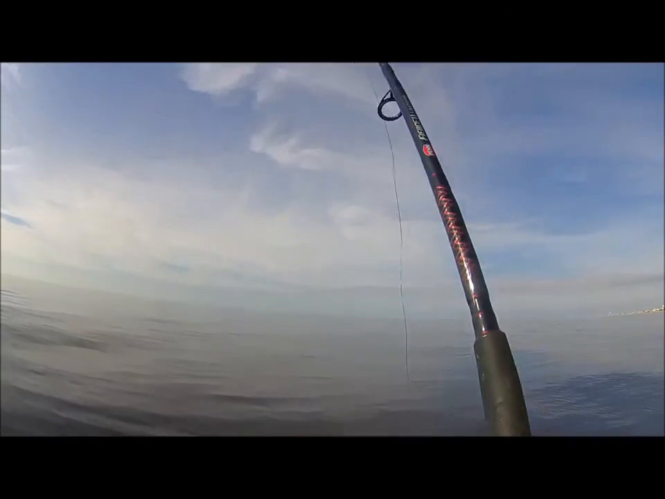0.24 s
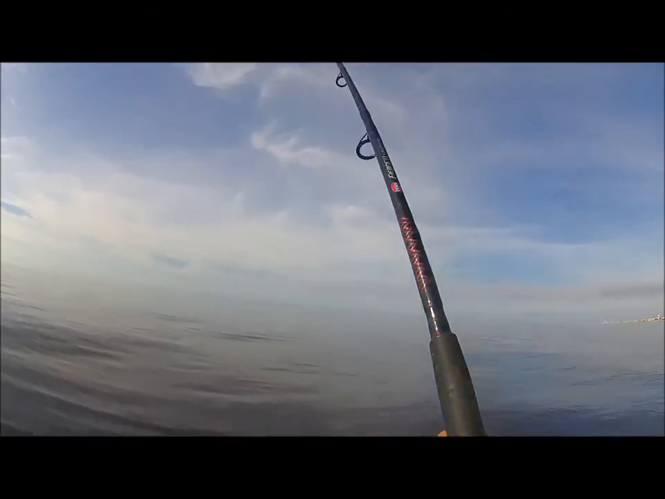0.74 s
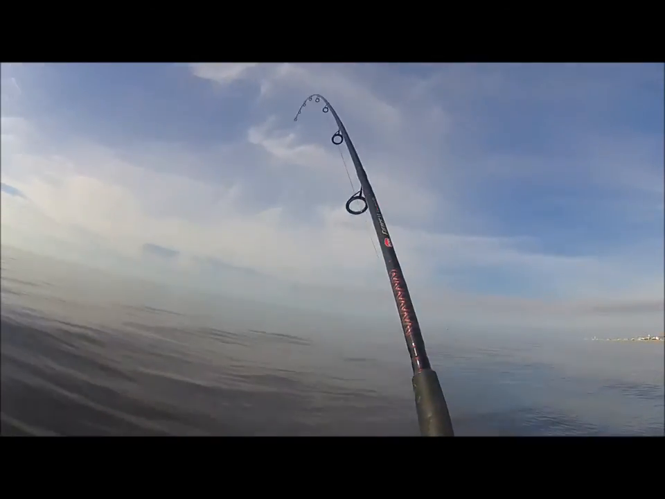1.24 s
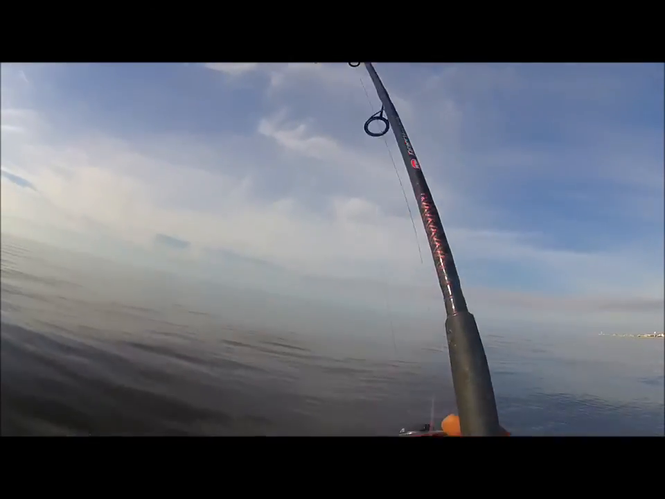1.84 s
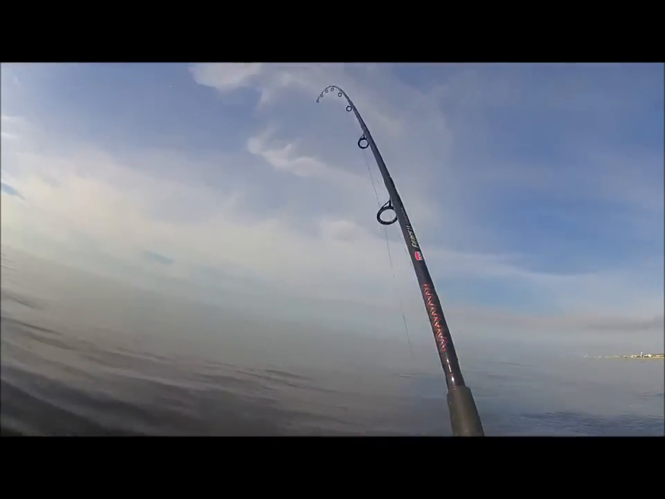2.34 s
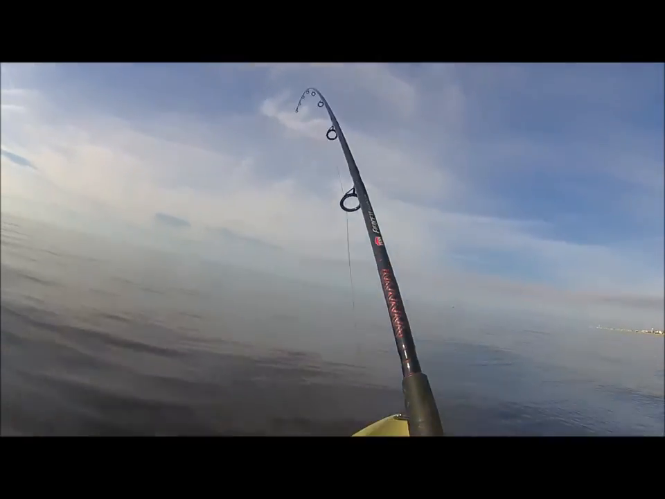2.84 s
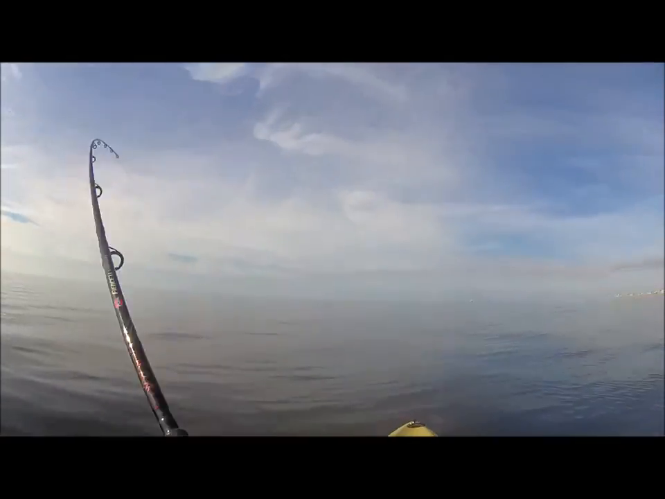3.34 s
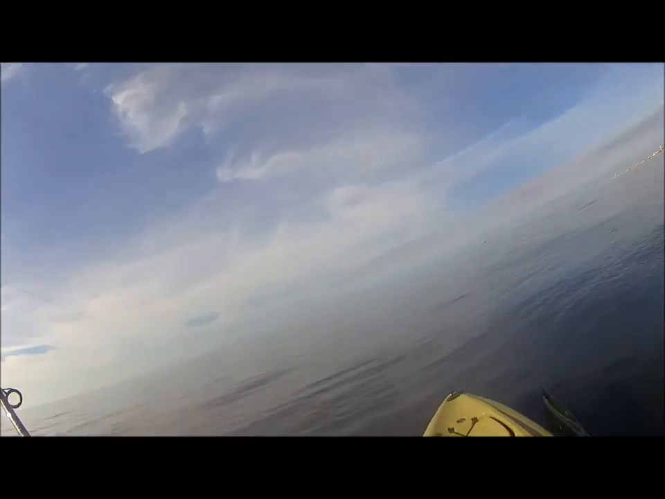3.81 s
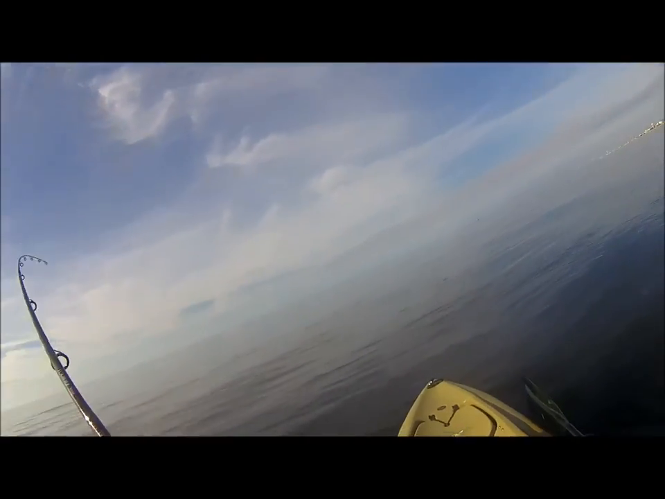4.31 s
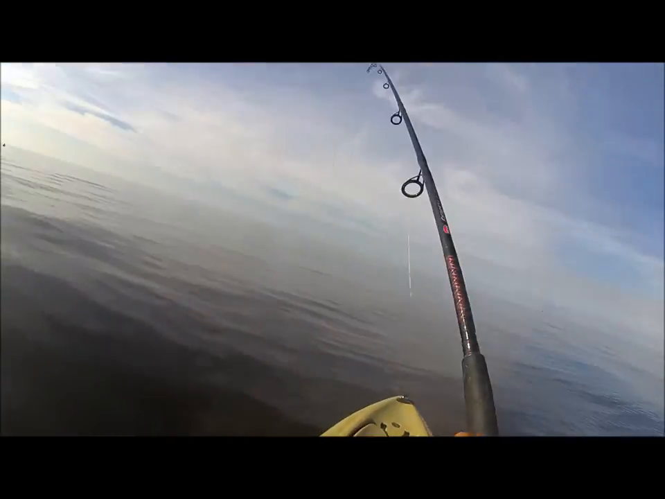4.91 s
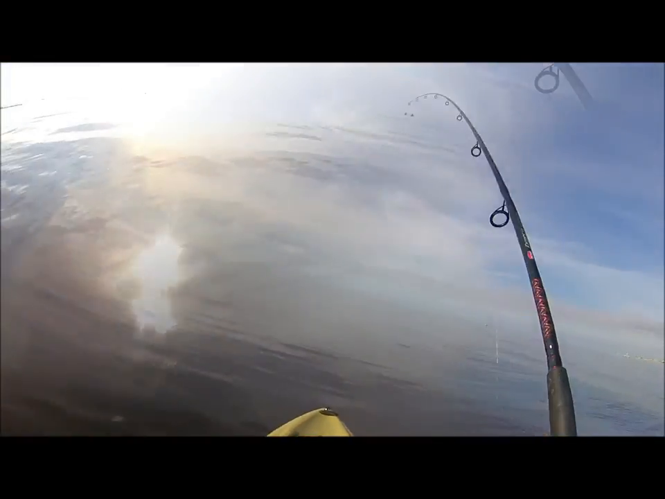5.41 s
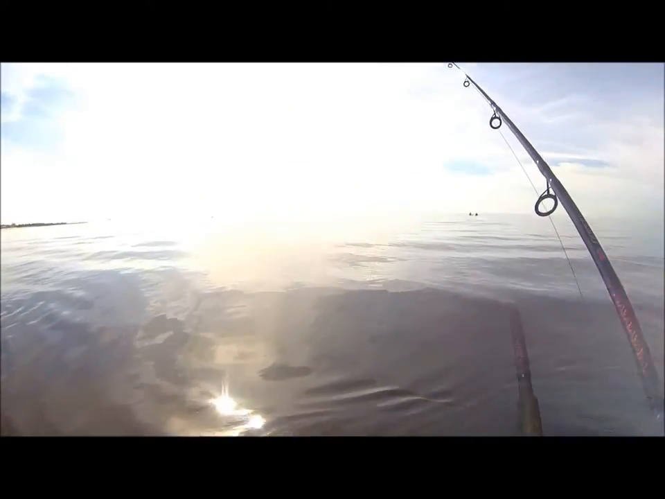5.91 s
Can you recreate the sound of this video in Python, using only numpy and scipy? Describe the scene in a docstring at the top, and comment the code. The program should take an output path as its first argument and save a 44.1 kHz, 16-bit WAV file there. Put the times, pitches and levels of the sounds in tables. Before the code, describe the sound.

Muffled close reel noise on a kayak: chirpy squeaks, clicks and rattles, then a low hull rub and a steadier gritty whirr.

```python
"""In a kayak, through a camera's closed housing: a fishing reel whirrs, squeaks, clacks and ticks under load.
The reel is patter, ratchet teeth and noise bursts ringing in resonances, with gliding sines for the squeaks.
The rod butt rubs and knocks on the hull in low wavering tones and noise, and water laps as lumpy low noise.
A far engine hums in a few sine orders; the electronics add shaped hiss and a comb of thin sines."""
import sys
import numpy as np
from scipy import signal
from scipy.fft import rfft, irfft
from scipy.io import wavfile

SR = 44100
rng = np.random.default_rng(int(sys.argv[2]) if len(sys.argv) > 2 else 0)


def log_audio(samples):
    """Write samples as a 16-bit WAV file to the path given in sys.argv[1]."""
    # one column per channel
    frames = np.atleast_2d(samples).T
    # limit to full scale, then quantise
    limited = np.clip(frames, -1, 1)
    pcm = np.round(limited * 32767).astype(np.int16)
    wavfile.write(sys.argv[1], SR, pcm)


N = 271642
T = np.arange(N) / SR

# resonances of the air in the housing, lower group: f/Hz, width/Hz, level/dB
LOW_MODES = [(1393, 134, -1), (1825, 164, 2.5), (1970, 56, 6.5), (2150, 140, 9), (2423, 128, 3.5),
             (2560, 188, 8)]
# resonances of the reel, for ticks and ratchet: f/Hz, width/Hz, level/dB
REEL_MODES = [(1790, 340, -3), (3980, 660, -1), (4980, 380, 10.5), (6120, 460, 0.5), (7470, 470, 1.5),
              (8720, 450, -1), (10260, 1600, -7), (12600, 500, -9.5)]
# runs of the ratchet as the handle comes round: middle t/s, length/s, level/dB, middle rate/(teeth per s)
RATTLES = [(0.565, 0.063, -57, 74), (0.868, 0.069, -53, 117), (1.135, 0.11, -54, 120),
           (1.447, 0.096, -59, 100), (1.717, 0.11, -53.5, 130), (2.053, 0.19, -57, 63),
           (2.576, 0.079, -60, 110), (2.839, 0.21, -55, 215), (3.049, 0.18, -59, 63),
           (3.366, 0.17, -63.5, 45), (3.696, 0.14, -59, 61), (5.526, 0.1, -62, 44)]
# ratchet level between the runs: t/s, level/dB
RATTLE_FLOOR = [(0, -66), (2.2, -63.5), (4.2, -78), (4.88, -82), (5.0, -67), (6.16, -61)]


def amp(db):
    """Decibels to a linear gain."""
    return 10 ** (np.asarray(db) / 20)


def evened(x):
    """Scales a sound to rms 1."""
    return x / np.sqrt(np.mean(x ** 2) + 1e-20)


def add(mix, s, sound):
    """Lays a sound into the mix from s seconds on."""
    part = mix[round(s * SR):][:len(sound)]
    part += sound[:len(part)]


def columns(rows, t):
    """Reads every column of a table at the times t, in straight lines between rows."""
    s, *rest = np.transpose(rows)
    return [np.interp(t, s, column) for column in rest]


def wander(length, hz):
    """Slow chance of rms 1, changing about hz times a second: noise through two equal smoothers."""
    noise = rng.standard_normal(length + 2000)
    smoother = [1, -2 * np.exp(-6 * hz / SR), np.exp(-12 * hz / SR)]
    return evened(signal.lfilter([1], smoother, noise)[2000:])  # the filter settles first


def resonate(x, hz, width):
    """Shifts the curve hz down to zero, smooths, and shifts back: a resonance of gain 1."""
    turn = np.exp(2j * np.pi * np.cumsum(hz * np.ones(len(x))) / SR)
    r = np.exp(-np.pi * width / SR)
    return 2 * (turn * signal.lfilter([1 - r], [1, -r], x / turn)).real


def ring(x, modes):
    """Steep modes, each resonated twice; alternating signs leave dark valleys between them."""
    out = 0
    for k, (hz, width, db) in enumerate(modes):
        once = resonate(x, hz, width * 1.35)
        out = out + (-1) ** k * amp(db) * resonate(once, hz, width * 1.35)
    return out


def lapping():
    """Water on the hull: noise of lumpy level through a broad, low resonance."""
    # slow swell of the water: t/s, level/dB
    swell = [(0, -57.5), (.8, -60), (2.0, -59.5), (2.8, -58.5), (3.1, -63.5), (4.1, -58.5), (5.2, -58.5),
             (5.7, -58.5), (6.16, -54.5)]
    noise = rng.standard_normal(N) * amp(2.6 * wander(N, 35))
    water = resonate(resonate(noise, 63, 112), 63, 112)
    return amp(columns(swell, T)[0]) * evened(water)


def engine():
    """Wavering orders of a far motor; as it leaves the upper ones fade, while the lowest grows."""
    # firing rate, sinking: t/s, f/Hz
    firing = [(0, 61.7), (1.5, 60.85), (4.2, 60.3), (6.16, 59.2)]
    # orders of the firing rate: multiple, peak level at the start before the waver/dB
    orders = [(3, -72), (4, -62.5), (5, -62.5), (6, -67), (7, -73)]
    hz = columns(firing, T)[0] * (1 + 0.0013 * wander(N, 4.3))
    turns = 2 * np.pi * np.cumsum(hz) / SR
    hum = 0
    for k, db in orders:
        tilt_db = -0.9 * (k - 4) * T  # steeper for higher orders
        hum = hum + amp(db + tilt_db + 1.4 * wander(N, 1.6)) * np.sin(k * turns)
    return hum


def electronics():
    """Smooth hiss and a steady comb of thin tones, stepping up in level together."""
    # spectrum of the hiss: f/Hz, relative density/dB
    hiss_curve = [(15, -12), (60, -23), (120, -7.5), (250, -8), (500, -12.5), (1000, -16), (3000, -21),
                  (6000, -24.5), (16000, -27.5)]
    # comb of tones: multiple of the base pitch, rms level before the gain/dB
    comb = [(10, -75), (21, -75), (22, -72), (23, -67), (24, -66.5), (25, -66), (26, -65.5), (27, -72),
            (31, -78), (33, -78), (34, -80)]
    # shared gain of hiss and whine: t/s, gain/dB
    gain = [(0, 0), (4.86, 0.5), (4.89, 4.5), (6.16, 4)]
    base_hz, hiss_db = 172.92, -57.5  # the hiss level is before the gain
    hz = np.fft.rfftfreq(N, 1 / SR)
    f, db = np.transpose(hiss_curve)
    shape = amp(np.interp(np.log(hz + 1), np.log(f), db))
    hiss = evened(irfft(rfft(rng.standard_normal(N)) * shape, N))
    whine = 0
    for k, rms_db in comb:
        whine = whine + np.sqrt(2) * amp(rms_db) * np.sin(2 * np.pi * (k * base_hz * T + rng.random()))
    return (amp(hiss_db) * hiss + whine) * amp(columns(gain, T)[0])


def knock(s, db, hz):
    """A soft push that rings the hull for a couple of cycles, with a short puff over it."""
    t = np.arange(4000) / SR
    puff = evened(resonate(rng.standard_normal(len(t)), 290, 1200))
    body = np.sin(2 * np.pi * hz * t) + 0.4 * puff
    swell = (t / 0.0034) * np.exp(1 - t / 0.0098)  # fullest after 9.8 ms
    return s, amp(db) * body * swell


def rub(rows):
    """The butt drags in slips that shake the hull near its pitch and rasp in the housing."""
    slip_share = 0.4  # decay of each slip's rasp, in hull cycles
    t = np.arange(rows[0][0], rows[-1][0], 1 / SR)
    db, hz, rasp_db = columns(rows, t)
    turns = np.cumsum(hz * (1 + 0.068 * wander(len(t), 30.4))) / SR
    tone = np.sin(2 * np.pi * turns)
    noise = rng.standard_normal(len(t))
    rumble = resonate(resonate(noise, hz * 1.4, 68), hz * 1.34, 61)
    boom = evened(tone + 0.5 * evened(rumble))

    slips = 0.5 + np.exp(-(turns % 1) / slip_share)
    scrape = noise * slips * amp(1.5 * wander(len(t), 150))
    rasp = evened(resonate(resonate(scrape, 3790, 900), 3790, 900))
    rasp = rasp + 0.6 * evened(ring(scrape, LOW_MODES))
    outer_modes = [(1600, 250, 6), (6600, 900, -7), (8840, 500, -1)]  # f/Hz, width/Hz, level/dB
    rasp = rasp + 0.12 * evened(ring(scrape, outer_modes))
    return t[0], (amp(db) * boom + amp(rasp_db) * rasp) * signal.windows.tukey(len(t), .15)


def clack(s, db, hz, ring_ms):
    """One sine note with a sharp start, dying away exponentially."""
    t = np.arange(2400) / SR
    envelope = np.minimum(t / 0.00022, 1) * np.exp(-1000 * t / ring_ms)
    return s, amp(db) * np.sin(2 * np.pi * hz * t) * envelope


def ticks():
    """Each tick is a burst a few ms long that rings the reel's modes in its own mix."""
    # ticks of the reel: t/s, peak level/dB
    hits = [(0.178, -42), (0.3222, -38.5), (0.3686, -45), (0.394, -50), (0.411, -45), (0.528, -49),
            (0.5507, -38), (0.821, -40), (0.836, -36), (0.706, -39.5), (1.059, -36.5), (1.0929, -48),
            (1.1187, -38), (1.1867, -44), (1.24, -45), (1.332, -43), (1.3902, -42), (1.419, -41),
            (1.4551, -38.5), (1.5795, -42.5), (1.6372, -37), (1.6622, -46), (1.697, -38), (1.7925, -40),
            (1.8528, -38), (1.934, -42), (1.882, -43), (1.9815, -38), (2.0028, -39), (2.0195, -36),
            (2.155, -39), (2.533, -45), (2.9366, -44), (2.986, -37.5), (3.0305, -37), (3.061, -40),
            (3.1173, -43), (3.2792, -39), (3.31, -45), (3.3335, -39), (3.403, -36.5), (3.5857, -38.5),
            (3.607, -44), (3.632, -40), (3.7615, -41), (3.779, -49), (3.798, -42), (3.8165, -45),
            (4.412, -50), (4.497, -46), (4.5226, -45), (4.7112, -50), (4.795, -39.5), (5.1667, -40.5),
            (5.3083, -43), (5.4605, -38)]
    t, out = np.arange(800) / SR, np.zeros(N)
    for s, db in hits:
        burst = rng.standard_normal(len(t)) * np.exp(-t / 0.002)
        modes = []
        for hz, width, mode_db in REEL_MODES:
            detune, lift_db = rng.standard_normal(2) * [0.03, 1.5]
            modes.append((hz * (1 + detune), width, mode_db + lift_db))
        tick = ring(burst, modes)
        add(out, s, amp(db) * tick / abs(tick).max())
    return out


def patter(per_s, spread_db):
    """Random grains of uneven size, about per_s of them a second."""
    size = amp(spread_db * np.minimum(rng.exponential(1, N), 5))
    return size * rng.standard_normal(N) * (rng.random(N) < per_s / SR)


def rattle_db():
    """Bell-shaped bursts over a low floor: the level, and how far it stands over the floor."""
    floor_db = columns(RATTLE_FLOOR, T)[0]
    bursts = sum(amp(2 * db) * np.exp(-8 * ((T - s) / length) ** 2) for s, length, db, _ in RATTLES)
    level_db = 10 * np.log10(amp(2 * floor_db) + bursts)  # powers add
    return level_db, level_db - floor_db


def ratchet():
    """Nearly even teeth, one about the middle of each run, and scattered slips along a low floor."""
    slowing, tooth_s = 0.86, 0.0025  # teeth spread out towards both ends; decay of each tooth in s
    teeth, count = np.zeros(N), np.arange(-24, 25)
    for s, length, db, per_s in RATTLES:
        late, size = rng.standard_normal((2, len(count)))
        u = (count + 0.092 * late) / per_s
        u = u * (1 + slowing * (u / length) ** 2)  # s from the middle of the run
        at = np.clip(((s + u) * SR).astype(int), 0, N - 1)
        bell = np.exp(-4 * (u / length) ** 2)
        # dense teeth overlap, so each is made smaller
        teeth[at] += amp(db + 1.8 * size) * bell / np.sqrt(per_s * tooth_s / 2)
    fall = [1, -np.exp(-1 / (tooth_s * SR))]
    slips = evened(signal.lfilter([1], fall, abs(patter(300, 0.81))))
    return signal.lfilter([1], fall, teeth) + amp(columns(RATTLE_FLOOR, T)[0]) * slips


def rattle():
    """The ratchet's teeth gate noise into the reel's modes, and a thin sizzle runs beside them."""
    # thin band of hiss from the spool: t/s, level/dB
    sizzle_curve = [(0, -72), (.9, -68), (1.5, -63.5), (2.4, -70.5), (2.8, -66.5), (3.4, -69.5), (4.1, -75),
                    (4.85, -73), (4.98, -67), (5.3, -71), (6.16, -74)]
    noise = rng.standard_normal(N)
    grainy = noise * amp(2.0 * wander(N, 40))
    sizzle = evened(ring(grainy, [(7770, 260, 0), (7350, 300, -7)]))
    teeth = ring(noise * ratchet(), REEL_MODES) / ring(noise, REEL_MODES).std()
    return teeth + amp(columns(sizzle_curve, T)[0]) * sizzle


def lift(hz, notes):
    """Gain of the housing along a pitch curve: a sum of bell-like peaks."""
    return sum(amp(db) / (1 + ((hz - note_hz) / width) ** 2) for note_hz, width, db in notes)


def squeak(db, octave_db, pitch):
    """A slipping washer sings a wavering, broken tone, its octave and a faint third partial."""
    # housing notes that lift the pitch as it passes: f/Hz, half width/Hz, gain/dB
    pitch_notes = [(2170, 64, -4.5), (2538, 144, 1)]
    # housing notes that lift the octave: f/Hz, half width/Hz, gain/dB
    octave_notes = [(4520, 190, -2.5), (5020, 170, 0)]
    t = np.arange(pitch[0][0], pitch[-1][0], 1 / SR)
    hz = columns(pitch, t)[0]
    waver = 1 + 0.006 * wander(len(t), 146) + 0.009 * wander(len(t), 600)
    turns = 2 * np.pi * np.cumsum(hz * waver) / SR
    breaks_db = 3.0 * wander(len(t), 250) + 3.0 * wander(len(t), 70)
    grip = amp(db + np.minimum(breaks_db, 2.5))

    # the weaker of pitch and octave is turned down
    lower = lift(hz, pitch_notes) * amp(min(-octave_db, 0)) * np.sin(turns)
    upper = lift(2 * hz, octave_notes) * np.sin(2 * turns) + 0.018 * np.sin(3 * turns)
    partials = lower + amp(min(octave_db, 0)) * upper
    edges = np.minimum(np.minimum(t - t[0], t[-1] - t) / 0.009, 1)  # 9 ms swell and fade
    return t[0], grip * partials * edges


def flutter(hz):
    """A squeak that barely catches: a fuzzy wandering tone that comes and goes."""
    tone = resonate(rng.standard_normal(N), hz * (1 + 0.059 * wander(N, 17.6)), 78)
    return evened(tone * np.clip(wander(N, 35.0), 0, 1.3))


def whirr():
    """Gears and line slip in a dense patter that rings the housing, with a faint flutter of squeal in it."""
    # course of the whirr: t/s, level/dB, brightness between rattles/dB
    course = [(0.0, -54.5, 0.5), (0.12, -59, 2), (0.64, -56, -3.5), (1.62, -56.5, -2), (2.06, -55.5, 1.5),
              (2.32, -55, -6), (2.8, -51.5, -1.5), (2.98, -53.5, -7), (3.36, -54, -2.5), (3.5, -51, -7.5),
              (3.6, -54.5, 0), (3.68, -52, -6), (4.06, -54.5, -5.5), (4.39, -51, -11), (4.51, -54, -5.5),
              (4.68, -52.5, 2.5), (4.86, -53, -3.5), (5.03, -49.5, -1.5), (5.1, -52, 2), (5.28, -49, -5),
              (6.15, -50, -0.5)]
    # upper resonances of the air in the housing: f/Hz, width/Hz, level/dB
    high_modes = [(3803, 286, 2), (4090, 300, 1.7), (4527, 223, 6.2), (5003, 165, 3.3)]
    rattle_brightens = 0.62  # dB of brightness for each dB that a rattle stands over its floor
    db, bright_db = columns(course, T)
    even, uneven = patter(2500, 0.41), patter(2500, 2.0)
    shared = amp(1.3 * wander(N, 30))
    low = evened(ring(even * shared, LOW_MODES)) + 0.4 * flutter(2550) + 0.3 * flutter(2080)
    high = evened(ring((.5 * even + uneven) * shared, high_modes)) + 0.2 * flutter(4750)
    high_db = db + bright_db + rattle_brightens * rattle_db()[1]
    return amp(db) * low + amp(high_db) * high


def scene():
    """All sources, one channel."""
    # dull knocks on the hull: t/s, level before the swell/dB, f/Hz
    knocks = [(1.471, -59.5, 88), (3.372, -59, 87), (3.962, -58.5, 127), (5.072, -57.5, 110),
              (5.674, -49, 107), (5.858, -58, 79)]
    # one table a rub on the hull: t/s, boom level/dB, hull pitch f/Hz, rasp level/dB
    rubs = [
        [(4.2, -50, 126, -62), (4.22, -49.5, 113.4, -65), (4.27, -46.5, 102.4, -53), (4.34, -44.5, 103, -48),
         (4.405, -52, 87, -47), (4.44, -53, 81, -68)],
        [(4.5, -50, 111, -53), (4.55, -44, 86.5, -53.5), (4.6, -39, 104.8, -46), (4.645, -39.5, 101, -39),
         (4.715, -44.5, 76.4, -49), (4.77, -55, 70, -52)],
    ]
    # clacks that ring one note: t/s, level/dB, f/Hz, decay/ms
    clacks = [(0.052, -37.5, 1940, 2), (0.378, -57, 6450, 14), (0.838, -46.5, 1750, 8.7),
              (1.919, -47, 1720, 14), (2.3855, -41.5, 2100, 9.7), (2.824, -36, 1930, 9.9),
              (3.4022, -43, 1980, 11), (3.634, -40, 3850, 7), (3.6595, -39, 2000, 5),
              (3.9737, -31, 2550, 3), (4.156, -41.5, 3880, 6.9), (5.002, -42, 2070, 7.8),
              (5.611, -38.5, 3900, 8)]
    # squeaks of the drag: level before the housing/dB, octave over pitch/dB, turning points (t/s, f/Hz)
    squeaks = [ (-41, 12, [(0.0, 2206), (0.014, 2310), (0.026, 2650), (0.052, 2520)]),
               (-43, 13, [(0.221, 2570), (0.243, 2600), (0.263, 2600), (0.281, 2250), (0.299, 2660),
               (0.312, 2710)]), (-46, 8, [(0.408, 2700), (0.45, 2484)]), (-41, 11.5, [(0.445, 2610),
               (0.471, 2500), (0.499, 2630), (0.517, 2377), (0.562, 2064), (0.58, 2350), (0.603, 2660)]),
               (-41, 14, [(0.68, 2660), (0.704, 2600), (0.73, 2300), (0.762, 2570), (0.778, 2460),
               (0.796, 2570), (0.806, 2450)]), (-42, 9, [(0.8, 2470), (0.835, 2030)]),
               (-42, 12, [(0.855, 2090), (0.88, 2297), (0.902, 2700)]), (-46, 3, [(0.995, 2694),
               (1.034, 2294), (1.048, 2390), (1.07, 2210)]), (-44.5, 12, [(1.158, 2350), (1.18, 2630)]),
               (-41.5, 7, [(1.361, 2600), (1.388, 2170)]), (-42, 4, [(1.444, 2230), (1.462, 2480),
               (1.478, 2600)]), (-45.5, 2.5, [(1.527, 2604), (1.545, 2506), (1.572, 2570), (1.592, 2240),
               (1.625, 2380)]), (-44, 4.5, [(1.782, 2400), (1.8, 2450), (1.825, 2450)]),
               (-47, -3, [(1.835, 2160), (1.885, 2120)]), (-48, -15, [(1.95, 2170), (1.99, 2140)]),
               (-47.5, -6, [(2.005, 2780), (2.04, 2530)]), (-46, 9, [(2.278, 2530), (2.309, 2594),
               (2.339, 2380), (2.385, 2110)]), (-46.5, 9, [(2.42, 2336), (2.44, 2520), (2.478, 2570)]),
               (-50, -5, [(2.54, 2643), (2.575, 2594), (2.615, 2550)]), (-46, 17, [(2.585, 2590),
               (2.612, 2434), (2.646, 2480), (2.664, 2360), (2.685, 2260)]), (-53, 0, [(2.75, 2610),
               (2.775, 2480), (2.8, 2630), (2.83, 2560)]), (-48, -10, [(3.005, 2760), (3.032, 2640)]),
               (-44.5, 8, [(3.083, 2270), (3.103, 2570), (3.113, 2670)]), (-45.5, -3, [(3.117, 2550),
               (3.15, 2610)]), (-42.5, 8, [(3.158, 2730), (3.189, 2350), (3.221, 2370), (3.248, 2340)]),
               (-45, 3, [(3.43, 2400), (3.454, 2350), (3.476, 2484), (3.498, 2250)]),
               (-38.5, -34, [(3.668, 2500), (3.692, 2610), (3.704, 2820)]), (-41.5, -43, [(3.76, 2880),
               (3.799, 2507), (3.821, 2610), (3.839, 2850)]), (-43, -16, [(3.925, 2690), (3.947, 2500),
               (3.972, 2670)]), (-50, -21, [(3.978, 2690), (4.0, 2340)]), (-44.5, -23, [(4.035, 2570),
               (4.057, 2564), (4.075, 2420)]), (-51, 11, [(4.21, 2460), (4.25, 2440)]),
               (-43.5, -29, [(4.552, 2450), (4.575, 2560), (4.6, 2540)]), (-49, -27, [(4.615, 2574),
               (4.69, 2525), (4.745, 2560)]), (-47, 6, [(5.245, 2590), (5.262, 2440), (5.282, 2490)]),
               (-47, 2, [(5.655, 2540), (5.682, 2490)]), (-51, 8, [(5.985, 2470), (6.012, 2560)]), ]
    mix = lapping() + engine() + electronics() + ticks() + rattle() + whirr()
    events = [knock(*row) for row in knocks]
    events += [rub(rows) for rows in rubs]
    events += [clack(*row) for row in clacks]
    events += [squeak(*row) for row in squeaks]
    for s, sound in events:
        add(mix, s, sound)
    return mix[None]


def record(dry):
    """The band limit: a steep low-pass at 15380 Hz."""
    low_pass = signal.firwin(1023, 15380, window=("kaiser", 9), fs=SR)
    return signal.oaconvolve(dry, low_pass[None], "same")


dry = scene()
out = record(dry)
log_audio(out)
```